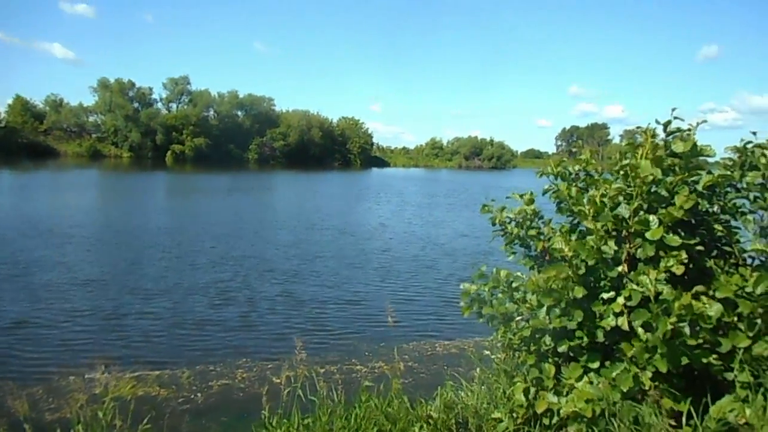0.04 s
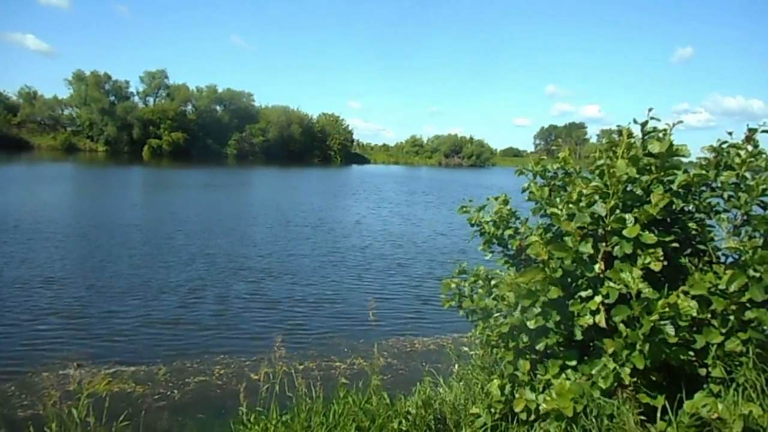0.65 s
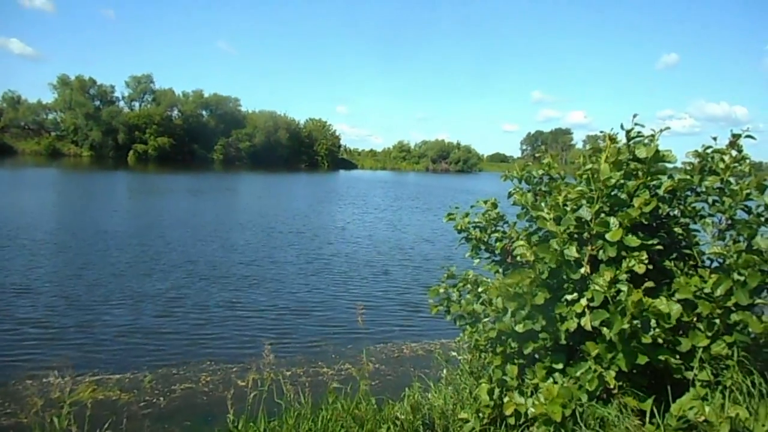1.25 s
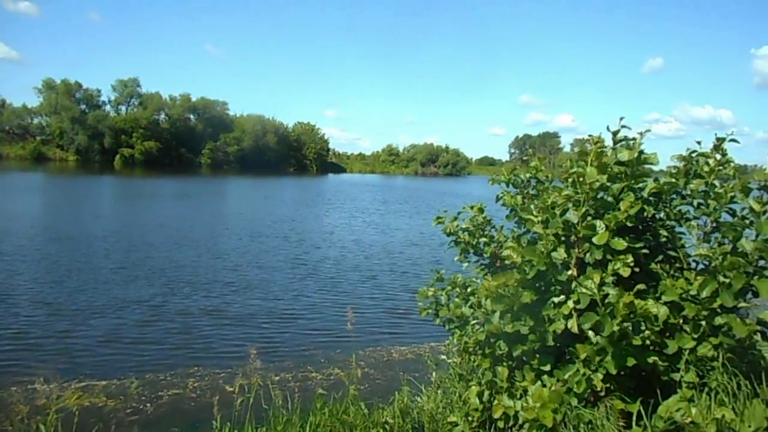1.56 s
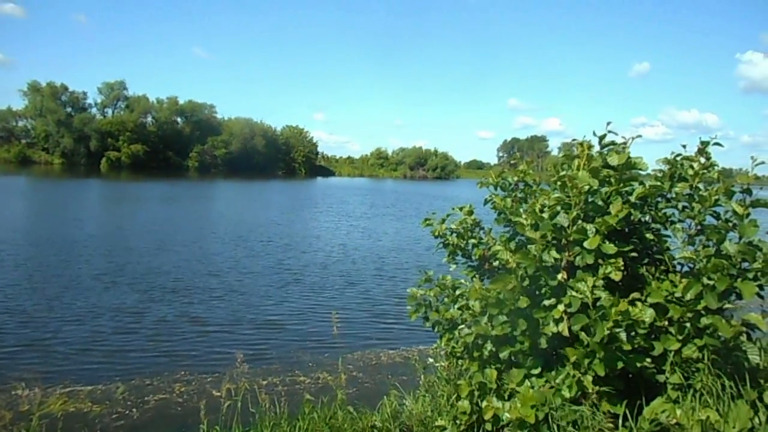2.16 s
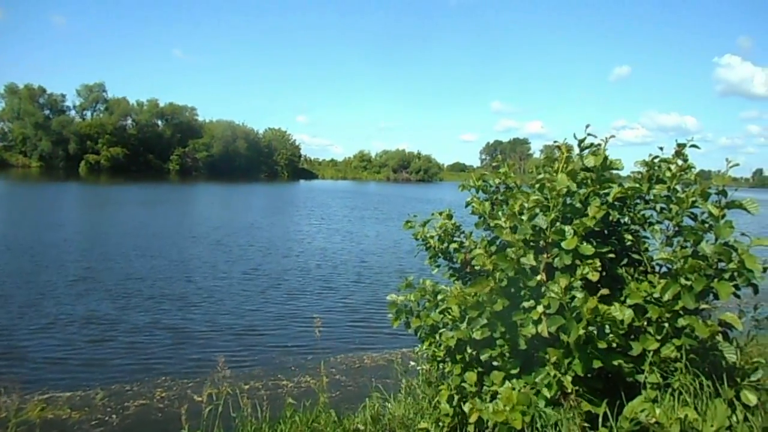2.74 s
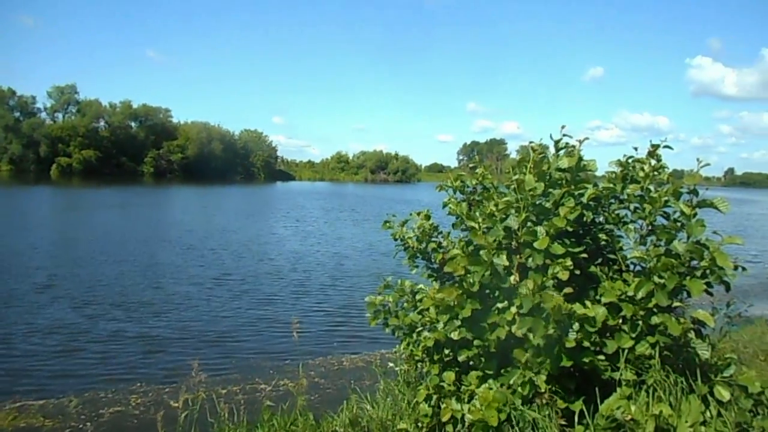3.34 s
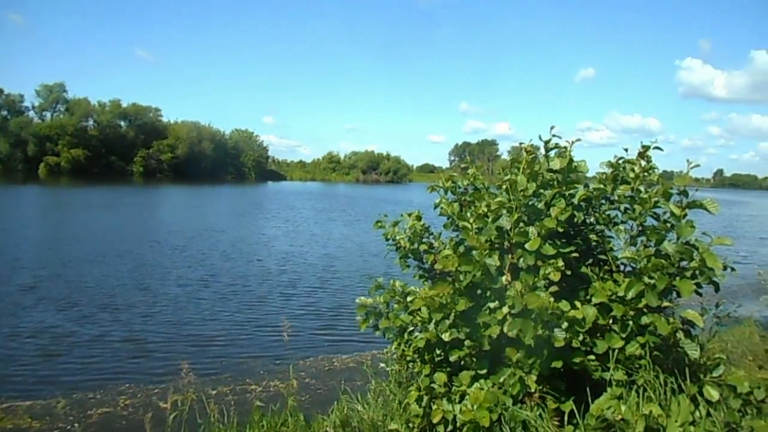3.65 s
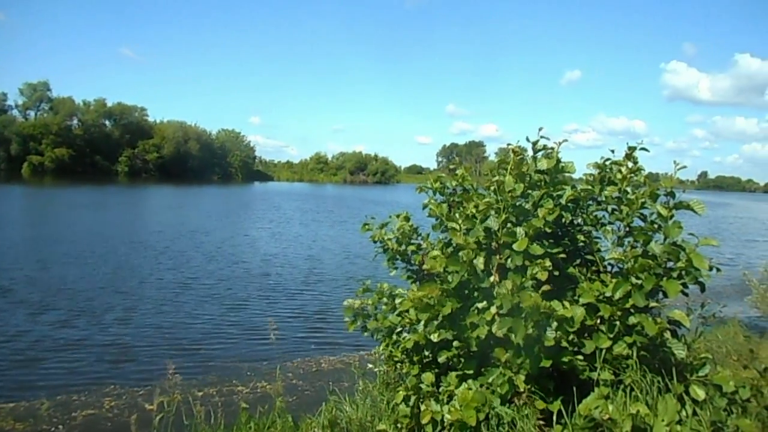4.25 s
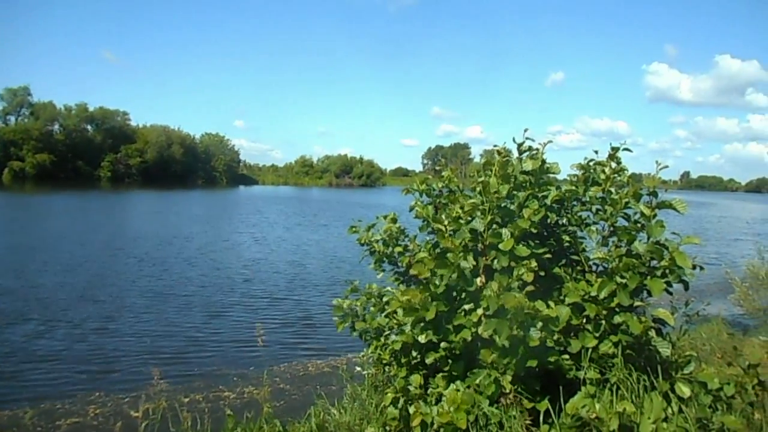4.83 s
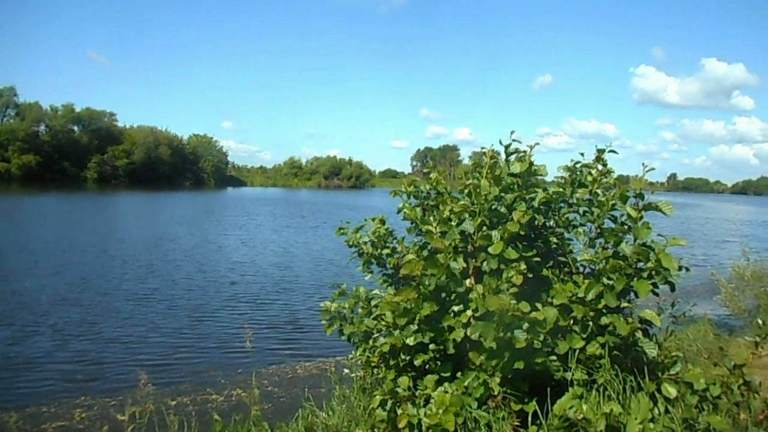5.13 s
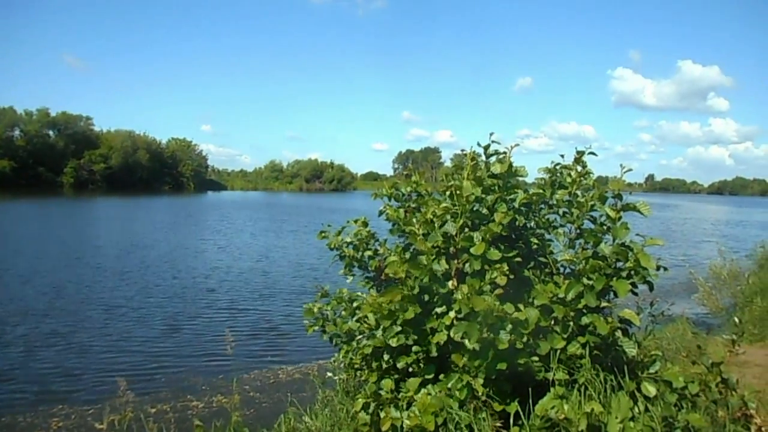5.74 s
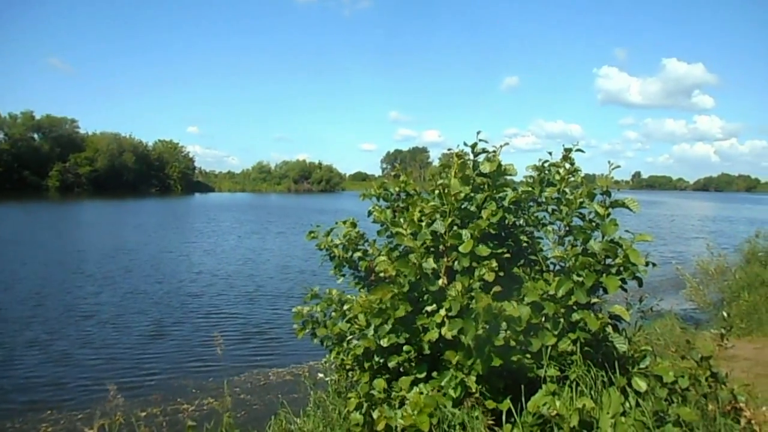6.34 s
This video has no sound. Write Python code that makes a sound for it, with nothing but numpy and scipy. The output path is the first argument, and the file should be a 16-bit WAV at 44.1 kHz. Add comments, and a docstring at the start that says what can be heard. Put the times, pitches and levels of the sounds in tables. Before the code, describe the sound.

From the start, many frogs croak in a dense chorus by a river, with fast runs of quacks over more distant calls and a soft, diffuse echo. The chorus is loudest and has a shrill, raspy edge until about 2 seconds. Gusts of breeze bump the microphone during this stretch, with the strongest thump at about 0.7 seconds. A faint low hum sits underneath and fades out by 3 seconds. From about 2.5 seconds the frogs thin to shorter runs and scattered, drawn-out calls that swell, glide in pitch and slow into a rattle. Weaker wind puffs return around 3.5 seconds and lightly afterwards. After 5 seconds only a few quiet croaks remain. Faint dry ticks come now and then, and leaves rustle very softly once near 6 seconds. A steady soft hiss continues to the end, at about 6.5 seconds.

```python
"""A river bank full of frogs: a dense chorus with fast runs of quacks thins to scattered drawn-out calls.
Each call is a train of pulses ringing the frog's vocal sacs; it swells, glides in pitch and turns
ragged as the pulses slow. The banks answer with a diffuse echo. Gusts of breeze bump the microphone,
a low hum fades away, and faint ticks and a leaf rustle sit over a steady hiss."""
import sys
import numpy as np
from scipy import signal
from scipy.fft import rfft, irfft, next_fast_len
from scipy.io import wavfile
from scipy.ndimage import uniform_filter1d, map_coordinates

SR = 44100
rng = np.random.default_rng(int(sys.argv[2]) if len(sys.argv) > 2 else 0)


def log_audio(samples):
    """Write samples as a 16-bit WAV file to the path given in sys.argv[1]."""
    # one column per channel
    frames = np.atleast_2d(samples).T
    # limit to full scale, then quantise
    limited = np.clip(frames, -1, 1)
    pcm = np.round(limited * 32767).astype(np.int16)
    wavfile.write(sys.argv[1], SR, pcm)


N = 286209

# resonances of the vocal sacs: multiple of the sac pitch, width/Hz, level/dB
SAC_MODES = [(0.581, 615, -15), (0.996, 285, 9)]
def frog_voice(sac_hz, pulse_hz, jitter_s, slip_rad, scatter_db=1, ragged_hz=260, attack_s=0.00031,
               throat_hz=4050, throat_width_hz=420, throat_db=-21):
    """A frog's voice at even loudness: every pulse of the larynx rings the sacs and the throat."""
    n = len(pulse_hz)
    cycles = np.cumsum(pulse_hz) / SR
    onsets = np.interp(np.arange(.1, cycles[-1], 1), cycles, np.arange(n))
    # fast pulses are regular and keep step with the ringing, slow ones are uneven in time, size, phase
    ragged = np.minimum((ragged_hz / pulse_hz[onsets.astype(int)]) ** 1.78, 1.3)
    late, strong, slipped = rng.standard_normal((len(onsets), 3)).T * ragged
    ring_hz = sac_hz[onsets.astype(int), None]
    sac_phase = 2 * np.pi * np.interp(onsets, np.arange(n), np.cumsum(sac_hz)) / SR
    phase = (sac_phase + slip_rad * slipped)[:, None]
    onsets = np.maximum(onsets + late * jitter_s * SR, 0)
    index = np.ceil(onsets).astype(int)[:, None] + np.arange(300)
    t = (index - onsets[:, None]) / SR
    damping = np.pi * np.sqrt(ring_hz / 1800)  # low notes ring longer
    sacs = sum(amp(db) * np.exp(-damping * width * t) * np.sin(2 * np.pi * ratio * ring_hz * t + phase)
               for ratio, width, db in SAC_MODES)
    throat_gain = amp(throat_db) * (ring_hz / 2200) ** 4  # only high, forceful notes excite the throat
    throat = throat_gain * np.exp(-np.pi * throat_width_hz * t) * np.sin(2 * np.pi * throat_hz * t)
    attack = (1 - np.exp(-t / attack_s)) ** 2
    rings = (sacs + throat) * attack * amp(scatter_db * strong)[:, None]
    train = np.bincount(index.ravel(), rings.ravel(), n)[:n]
    power = np.abs(uniform_filter1d(train ** 2, SR // 40))
    return train / np.sqrt(power + np.mean(power) / 20)


def croak(length, sac_hz, pulse_hz, slowing=0.3195, arch=0.42, sag=0.12, rise=0.21, fall=0.42):
    """One short note: it swells and fades while its pulses slow and the sacs arch and sag in pitch."""
    u = np.linspace(-.5, .5, int(length * 1.1 * SR))
    swell = np.clip(np.minimum((u + .5) / rise, (.5 - u) / fall), 0, 1)
    bow = np.exp(-arch * (u ** 2 - np.mean(u ** 2) / 2))
    pitch = sac_hz * bow * np.exp(-sag * u)
    pulse_rate = pulse_hz * bow * np.exp(-slowing * u)
    return swell * frog_voice(pitch, pulse_rate, jitter_s=0.00015, slip_rad=1.0)


# runs of quacks: first t/s, last t/s, count, tempo drag 0-1, nominal quack length/s, top level/dB,
# place of the top 0-1, fade a whole run from the top/dB, first and last sac f/Hz,
# first and last pulse rate/Hz
QUACK_RUNS = [(.009, 0.154, 3, 0.01, 0.041, -21, .6, 14, 1807, 1807, 380, 323),
              (0.222, .535, 7, 0, .036, -17, 0.62, 9, 2037, 2006, 343, 390),
              (0.909, 1.177, 7, 0, .033, -18.5, .2, 14, 2000, 1920, 313, 276),
              (1.223, 1.36, 4, 0.02, 0.033, -21, 0.98, 5.5, 1486, 1710, 350, 290),
              (1.397, 1.812, 8, 0.09, .035, -14, .7, 14.5, 2434, 2009, 457, 300),
              (1.847, 1.885, 2, 0.2, 0.022, -18, 0.17, 4, 1808, 1786, 320, 310),
              (1.958, 2.244, 5, 0, 0.038, -23, 0.2, 6, 2223, 2150, 386, 350),
              (2.305, 2.355, 2, 0, .042, -25, 0, 4, 1850, 1655, 310, 340),
              (2.431, 2.553, 4, 0.04, 0.027, -25.5, 0.43, 24.5, 1380, 1250, 204, 230),
              (2.829, 2.97, 5, 0.2, 0.035, -24.5, 0.4, 17, 1454, 1688, 300, 258),
              (3.173, 3.291, 3, 0, .031, -27.5, 0, 1, 1723, 1648, 430, 330),
              (3.322, 3.624, 8, 0.34, 0.035, -26.5, 0.22, 17, 1539, 1736, 322, 146),
              (3.845, 3.931, 3, 0.12, .026, -23, .42, 25.5, 1336, 1690, 370, 250),
              (4.326, 4.475, 4, 0, .03, -21, 0.13, 22.5, 1634, 1884, 410, 210),
              (5.514, 5.64, 4, 0, .028, -33, 0, 1.5, 1210, 1474, 400, 300),
              (6.402, 6.472, 2, 0, 0.042, -40.5, 1, 0.5, 1150, 1252, 270, 165)]
def quack_runs(bend=1.855, pitch_per_db=0.02):
    """Each run swells and fades, its pitch following the effort; yields one croak row per quack."""
    for first, last, count, drag, length, top_db, top_at, fade_db, *glides in QUACK_RUNS:
        sac0, sac1, pulse0, pulse1 = glides
        u = np.linspace(0, 1, round(count))
        times = first + (last - first) * u * (1 - drag * (1 - u))
        effort_db = -fade_db * (u - top_at) ** 2
        sac_hz = glide(sac0, sac1, u, bend) * np.exp(pitch_per_db * effort_db)
        yield from zip(times, [length] * len(u), top_db + effort_db, sac_hz, glide(pulse0, pulse1, u))


# lone croaks: middle t/s, nominal length/s, level/dB, sac f/Hz, pulse rate/Hz
LONE_CROAKS = [(0.761, .036, -21, 1592, 330), (0.803, .022, -22.5, 2196, 430),
               (1.073, .036, -17.5, 1868, 273), (2.138, .026, -24.5, 1537, 300),
               (2.694, .04, -35, 1181, 240), (3.106, .034, -34, 1272, 340),
               (3.984, 0.018, -34.5, 1583, 230), (4.125, .034, -32, 1684, 230),
               (4.779, .028, -33.5, 1582, 190), (5.28, .034, -41.5, 1174, 220),
               (5.845, .036, -43, 1106, 220)]
def short_calls():
    """Foreground frogs: quacks in runs and single croaks, each one short train of pulses."""
    out = np.zeros(N)
    for s, length, db, sac_hz, pulse_hz in [*quack_runs(), *LONE_CROAKS]:
        note = croak(length, sac_hz, pulse_hz)
        add(out, s - len(note) / SR / 2, amp(db) * note)
    return out


# drawn-out calls: start t/s, length/s, top level/dB, place of the top 0-1, first and last sac f/Hz,
# first and last pulse rate/Hz
LONG_CALLS = [(0.221, 0.23, -24.5, 0.2, 1418, 1377, 260, 192),
              (.54, 0.11, -22.5, 0.62, 900, 1467, 360, 200), (0.792, 0.14, -19, .68, 2482, 2387, 560, 370),
              (1.292, 0.098, -24, 0.55, 1550, 1826, 400, 320),
              (2.347, 0.16, -30.5, 0.35, 1270, 1155, 154, 160),
              (2.728, .11, -24.5, 0.55, 1944, 1708, 350, 410),
              (3.16, 0.13, -37, 0.34, 1840, 1965, 460, 340), (3.273, 0.18, -28, 0.66, 1248, 1785, 330, 260),
              (3.719, 0.22, -29, 0.7, 1100, 1620, 343, 168),
              (4.006, 0.1, -27.5, 0.65, 1100, 1732, 365, 310),
              (4.174, 0.064, -26, 0.7, 1880, 1421, 420, 200), (4.226, 0.14, -27, .55, 1228, 1327, 160, 125),
              (4.166, .215, -33, 0.54, 500, 588, 200, 81), (4.517, 0.085, -39.5, 0.8, 2065, 1940, 430, 380),
              (4.59, .165, -28.5, 0.74, 1779, 1443, 400, 170),
              (4.975, .235, -32.5, .78, 2440, 1710, 380, 130), (4.978, 0.26, -39, .75, 1032, 1057, 170, 90),
              (5.459, 0.18, -37, 0.7, 1060, 1630, 295, 100), (5.747, 0.26, -50, 0.74, 1032, 1265, 240, 130)]
def long_calls(rise_db=12, fall_db=9.5, arch=.25):
    """Each call swells on a held pitch, then the sacs glide; in most the pulses slow toward a rattle."""
    out = np.zeros(N)
    for s, length, db, top_at, sac0, sac1, pulse0, pulse1 in LONG_CALLS:
        u = np.linspace(0, 1, int(length * SR))
        swell_db = np.interp(u, [0, top_at, 1], [-rise_db, 0, -fall_db])
        waver = 1 + 0.0165 * wobble(61.8)[:len(u)]
        bow = waver * np.exp(-arch * (u - .5) ** 2)
        eased = np.sin(np.pi * u / 2) ** 2
        sac_hz = glide(sac0, sac1, eased, bend=1.3) * bow
        pulse_hz = glide(pulse0, pulse1, eased, bend=1.25) * bow
        note = frog_voice(sac_hz, pulse_hz, jitter_s=.00009, slip_rad=0.82)
        add(out, s, amp(db + swell_db) * note * signal.windows.tukey(len(u), .12))
    return out


# shrill rasps over the busiest runs: middle t/s, nominal length/s, level/dB
RASPS = [(0.549, 0.35, -43.5), (1.101, 0.33, -40.5), (1.671, 0.37, -43), (3.368, .26, -54.5),
         (4.316, .2, -56)]
def rasps(band_hz=4650, width_hz=650, grain_db=3, throb_hz=20, throb_db=1.5):
    """The shrill top of the chorus: long ragged notes that swell, throb and arch in pitch."""
    out = np.zeros(N)
    for s, length, db in RASPS:
        note = croak(length, sac_hz=4500, pulse_hz=199, arch=1.0, sag=0.0377)
        t = (np.arange(len(note)) - len(note) / 2) / SR
        throb = -np.cos(2 * np.pi * throb_hz * t)
        add(out, s + t[0], amp(db + throb_db * throb) * note * signal.windows.cosine(len(note)))
    grainy = out * amp(grain_db * wobble(90))
    return filtered(grainy, lambda hz: np.exp(-((hz - band_hz) / width_hz) ** 4))


# fader ride of the distant frogs: t/s, level/dB
FAR_FADER = [(0, -25), (.6, -25), (.78, -28.5), (1.1, -26), (1.48, -30), (1.6, -25.5), (2.05, -29),
             (2.4, -33), (2.62, -36.5), (3.12, -45), (3.35, -35), (3.68, -44), (4.6, -44), (4.9, -58)]
def far_frogs(sac_hz=1680, pulse_hz=280, variety=.24, sinking=.42, count=320):
    """A bed of distant frogs croaking at random; it sinks in pitch as it fades."""
    out = np.zeros(N)
    for i, (when, length, sac, pulse) in enumerate(rng.uniform(-1, 1, (count, 4))):
        pitch = sac_hz * np.exp(variety * sac - sinking * i / count)
        note = croak(0.03673 + 0.012 * length, pitch, pulse_hz * np.exp(.35 * pulse))
        add(out, (i + when) / (count - 1) * N / SR - .03, note)
    return fader(FAR_FADER) * unit(out)


# EQ of the path over the water: f/Hz, gain/dB
WATER_EQ = [(200, -24.5), (420, -4), (800, 0), (1050, -1), (1400, -5.5), (2550, -2), (3250, -2.5),
            (3950, 9.5), (4700, -4), (5800, -18), (10000, -38.5)]
def frog_chorus():
    """Far and near frogs, coloured by the way over the water, with the rasps layered on top."""
    return equalised(far_frogs() + short_calls() + long_calls(), WATER_EQ) + rasps()


# reverb time of the banks: f/Hz, t60/s
BANK_DECAY = [(2000, 0.81), (8000, 0.037)]
def bank_echo(x):
    """The diffuse answer of the banks and trees: a dark tail after 10 ms of pre-delay."""
    hz, t, spectrum = signal.stft(rng.standard_normal(SR // 2), SR, nperseg=256)
    decay = amp(-60 * t / along(BANK_DECAY, hz)[:, None])
    tail = signal.istft(spectrum * decay, SR, nperseg=256)[1]
    return signal.fftconvolve(x, np.pad(tail / np.linalg.norm(tail), (SR // 100, 0)))[:N]


# gusts on the microphone: start t/s, end t/s, level/dB
GUSTS = [(0, .2, -42), (0.224, 0.737, -35.5), (0.776, 0.902, -31), (1, 1.15, -44), (1.371, 1.608, -38),
         (1.6, 1.952, -35.5), (2.213, 2.34, -39), (3.284, 3.556, -44), (4.434, 4.98, -57),
         (5.298, 5.573, -52.5), (6.227, 6.49, -58.5)]
def gust_envelope(edge_db_per_s=323):
    """Strength of the breeze in dB, one value per sample: each gust rises, holds and falls."""
    t = np.arange(N) / SR
    gusts = [db - edge_db_per_s * np.abs(t - np.clip(t, start, end)) for start, end, db in GUSTS]
    return np.max(gusts, axis=0)


# the strongest puffs on the microphone: t/s, level/dB
PUFFS = [(.029, -14), (.266, -17.5), (.385, -13.5), (.709, 1.5), (.846, -10.5), (.886, -11), (1.067, -11.5),
         (1.243, -17), (1.337, -8), (1.451, -8.5), (1.543, -8.5), (1.572, -9.5), (1.647, -15), (1.955, -17),
         (2.251, -21.5), (2.32, -24.5), (3.301, -21), (3.54, -18.5), (3.577, -23.5), (4.538, -31),
         (4.63, -28), (4.761, -29.5), (5.33, -30), (5.427, -29.5), (5.574, -30.5), (6.268, -24.5)]
# spectrum of the wind flutter: f/Hz, level/dB
FLUTTER_COLOUR = [(20, -30), (70, -0.5), (150, 5.5), (320, 1.5), (550, -8), (900, -43), (2000, -59)]
def breeze(puff_hz=489, db_per_octave=21, stir_s=0.0088, stir_db=-19, flutter_db=-7, small_count=140):
    """Each puff is one quick swing of pressure amid a stir of low noise; small ones ride the gusts."""
    swings, stir, gust_db = np.zeros(N), np.zeros(N), gust_envelope()
    t = np.arange(-SR // 20, SR // 20) / SR
    small_at = ((np.arange(small_count) + rng.random(small_count)) * (N - 1) / small_count).astype(int)
    small_db = gust_db[small_at] + 13 + 4 * rng.standard_normal(small_count)
    puffs = [*PUFFS, *zip(small_at / SR, small_db)]
    for (s, db), (push, detune) in zip(puffs, rng.standard_normal((len(puffs), 2))):
        hz = puff_hz * 2 ** (db / db_per_octave + .15 * detune)  # weaker puffs are deeper
        puff_s = 0.265 / np.sqrt(hz * 380)  # deep puffs last a little longer
        swing = np.sign(push) * np.cos(2 * np.pi * hz * t) / np.cosh(t / puff_s)
        add(swings, s + t[0], amp(db) * swing)
        add(stir, s + t[0], amp(db + stir_db) * np.exp(-.5 * (t / stir_s) ** 2))
    flutter = amp(gust_db + flutter_db + 4 * wobble(45))
    return swings + (stir + flutter) * noise(FLUTTER_COLOUR)


# faint ticks: t/s, level/dB, f/Hz
TICKS = [(.247, -35, 6560), (0.418, -32, 6250), (0.896, -35.5, 6100), (1.044, -33.5, 6000),
         (2.474, -27, 2620), (2.527, -36, 6800), (2.768, -36, 6500), (3.317, -30, 6400), (3.487, -34, 6500),
         (3.565, -35.5, 6500), (3.961, -32, 6700), (6.153, -26.5, 2150), (6.313, -31.5, 2090)]
def ticks(t60=0.034, relative_width=0.39, trim_db=-8):
    """Tiny dry ticks, each a burst of noise around its own pitch."""
    out, t = np.zeros(N), np.arange(SR // 20) / SR
    for s, db, hz in TICKS:
        band = signal.iirpeak(hz, 1 / relative_width, SR)
        burst = signal.lfilter(*band, rng.standard_normal(len(t)))
        add(out, s, amp(db + trim_db - 60 * t / t60) * unit(burst))
    return out


# spectrum of the leaves: f/Hz, level/dB
LEAF_COLOUR = [(1500, -28), (4000, -5), (8000, 4), (14000, -2.5)]
def leaf_rustle(middle_s=6.12, width_s=0.063, level_db=-55.5, crackle_db=7.0):
    """Leaves stir once: a brief swell of bright, crackly noise."""
    swell = np.exp(-.5 * ((np.arange(N) / SR - middle_s) / width_s) ** 2)
    return swell * amp(level_db + crackle_db * wobble(350)) * noise(LEAF_COLOUR)


# partials of the hum: f/Hz, level/dB
HUM_PARTIALS = [(49.4, -44), (98.8, -43)]
# fade-out of the hum: t/s, gain/dB
HUM_FADER = [(1.2, -4.5), (2.6, -13.5), (2.9, -19), (3.1, -44)]
def hum():
    """A low tone and its octave, dying away."""
    t = np.arange(N) / SR
    tones = sum(amp(db) * np.sin(2 * np.pi * hz * t + rng.uniform(0, 2 * np.pi))
                for hz, db in HUM_PARTIALS)
    return np.sqrt(2) * fader(HUM_FADER) * tones


# spectrum of the background hiss: f/Hz, level/dB
HISS_COLOUR = [(30, -3), (90, 1.5), (220, -7.5), (500, -3), (1000, 1), (2000, -5), (3200, -5.5),
               (5000, -9.5), (7000, -12), (10000, -8.5), (15000, -28)]
def hiss(level_db=-48.0, drift_db=1.7):
    """A bed of broad noise whose level drifts slightly."""
    return amp(level_db + drift_db * wobble(2.5)) * noise(HISS_COLOUR)


def amp(db):
    """Decibels to gain."""
    return 10 ** (np.asarray(db) / 20)


def unit(x):
    """Scaled to rms 1."""
    return x / np.sqrt(np.mean(x ** 2) + 1e-20)


def along(points, hz):
    """A curve of (f/Hz, value) points read on a log axis."""
    f, v = np.transpose(points)
    return np.interp(np.log(hz + 1), np.log(f + 1), v)


def fader(rows):
    """(t/s, level/dB) rows as one gain per sample."""
    return amp(np.interp(np.arange(N) / SR, *np.transpose(rows)))


def glide(first, last, u, bend=1):
    """From one frequency to another as u goes from 0 to 1; a bend above 1 makes the glide come late."""
    return first * (last / first) ** (u ** bend)


def wobble(rate):
    """A smooth random curve, rate knots a second."""
    return map_coordinates(rng.standard_normal(int(N * rate / SR) + 4), [np.arange(N) * rate / SR])


def filtered(x, response):
    """x shaped by a gain that depends on frequency."""
    size = next_fast_len(N + SR // 2)
    return irfft(rfft(x, size) * response(np.fft.rfftfreq(size, 1 / SR)), size)[:N]


def equalised(x, curve):
    """x through an EQ of (f/Hz, gain/dB) points."""
    return filtered(x, lambda hz: amp(along(curve, hz)))


def noise(colour):
    """Coloured noise of rms 1."""
    return unit(equalised(rng.standard_normal(N), colour))


def add(track, s, sound):
    """Mix a sound into the track from time s on."""
    at = round(s * SR) + np.arange(len(sound))
    inside = (at >= 0) & (at < N)
    track[at[inside]] += sound[inside]


def scene(echo_db=-16.5):
    """The mix at one microphone, alike in both channels; only the frogs feed the echo."""
    ambience = hiss() + breeze() + ticks() + leaf_rustle() + hum()
    chorus = frog_chorus()
    mono = chorus + amp(echo_db) * bank_echo(chorus) + ambience
    return np.array([mono, mono])


# treble shape: the top falls away, with a deep notch near 11 kHz and a faint band above it: f/Hz, gain/dB
TREBLE_EQ = [(7000, 1.5), (10000, -14.5), (11000, -37.5), (12500, -9.5), (15000, -24)]
TOP_HZ = 15100
def record(dry):
    """The chain clips at full scale, shapes the treble and cuts all above its band limit."""
    return np.array([filtered(channel, lambda hz: amp(along(TREBLE_EQ, hz)) * (hz < TOP_HZ))
                     for channel in np.clip(dry, -1, 1)])


dry = scene()
out = record(dry)
log_audio(out)
```